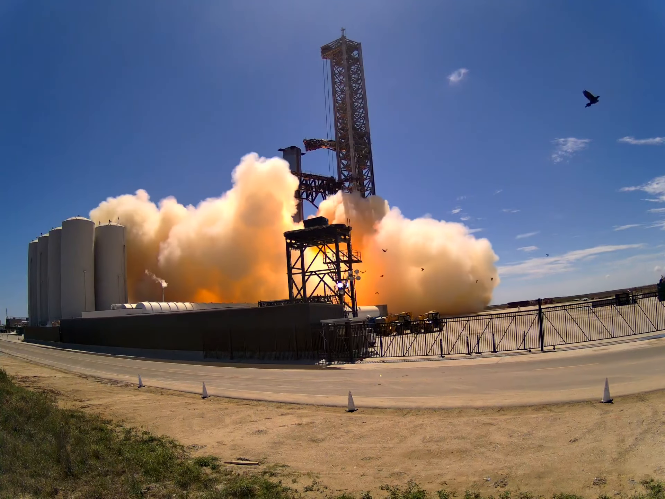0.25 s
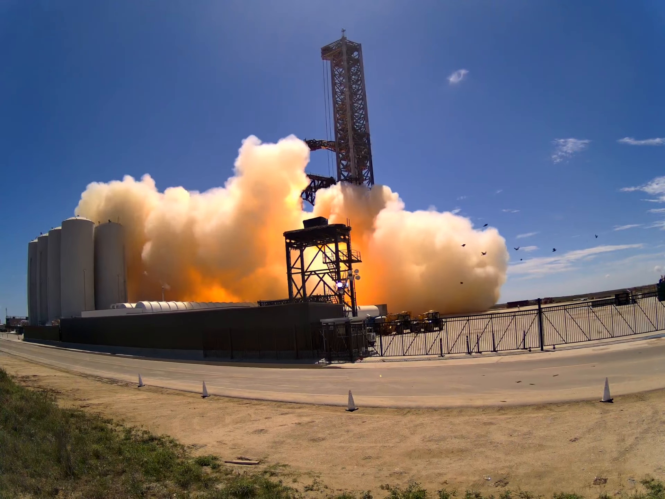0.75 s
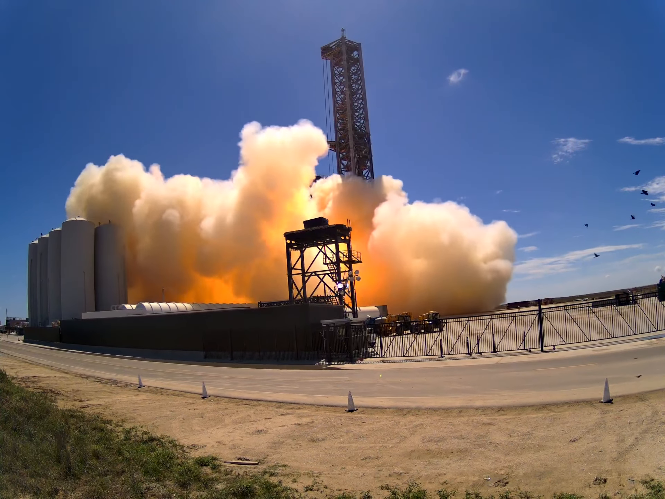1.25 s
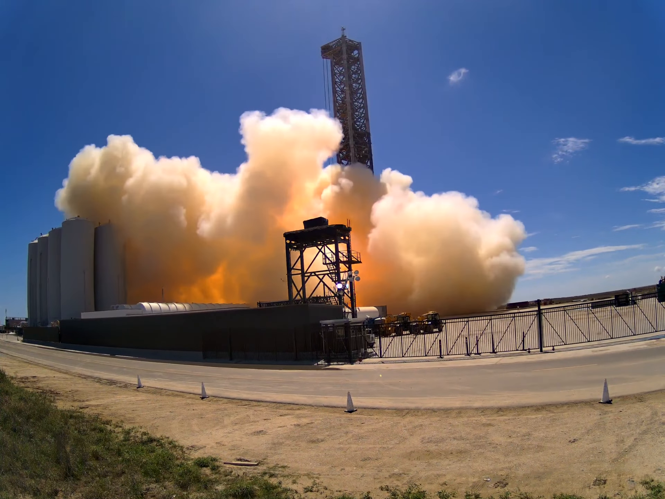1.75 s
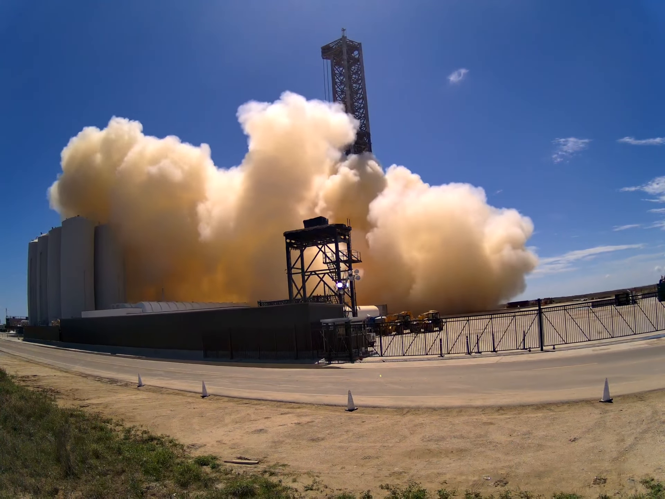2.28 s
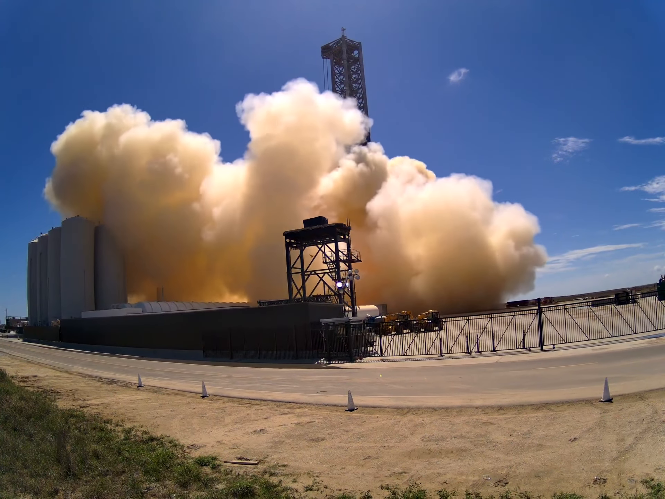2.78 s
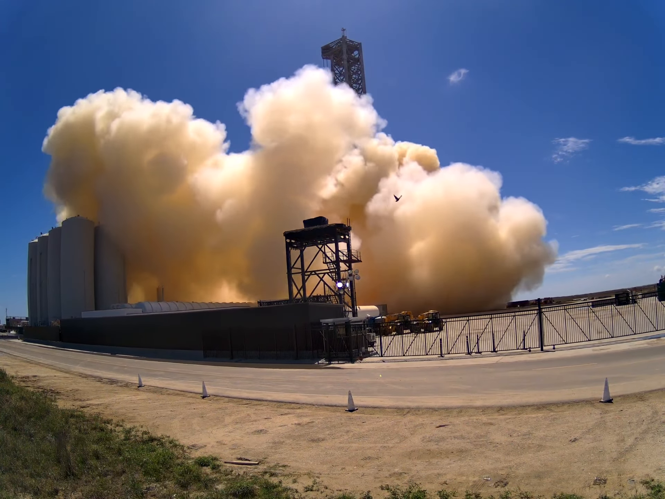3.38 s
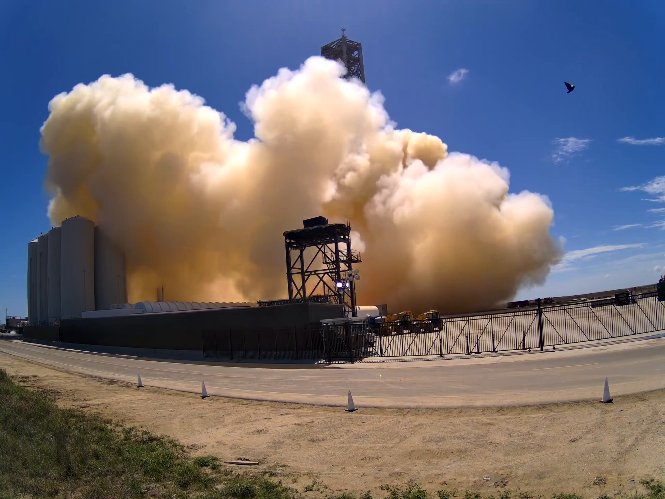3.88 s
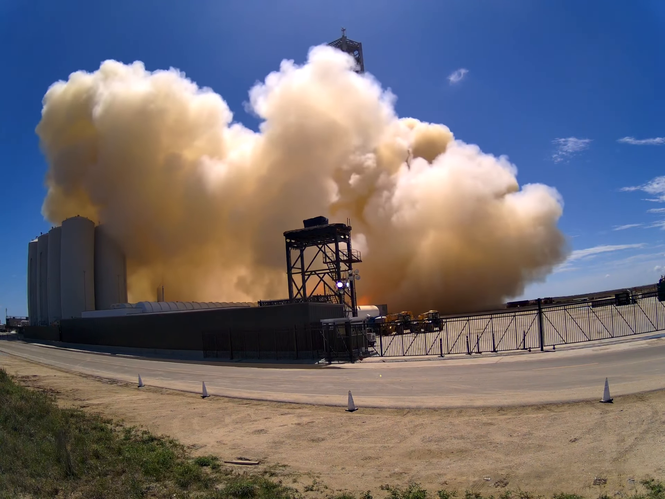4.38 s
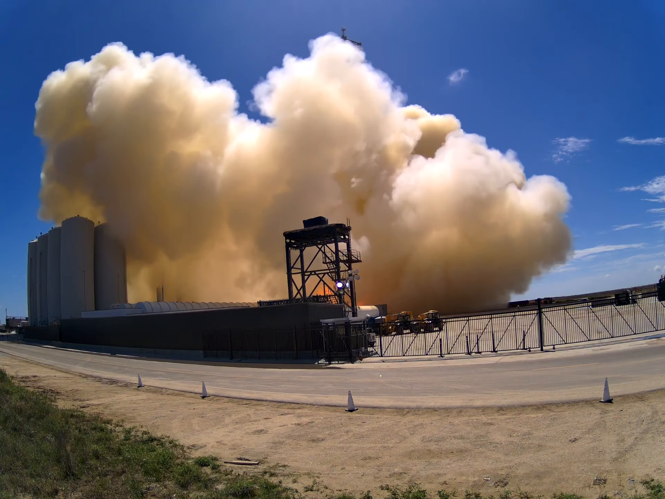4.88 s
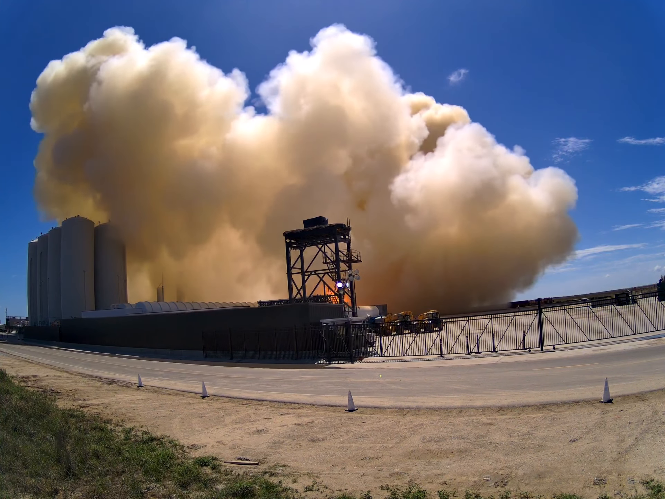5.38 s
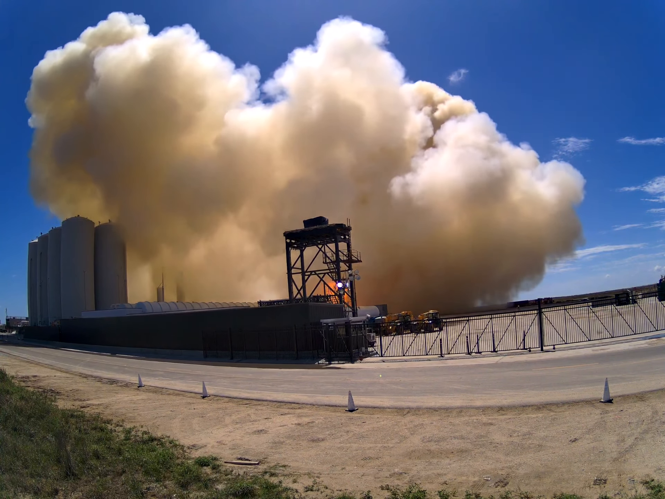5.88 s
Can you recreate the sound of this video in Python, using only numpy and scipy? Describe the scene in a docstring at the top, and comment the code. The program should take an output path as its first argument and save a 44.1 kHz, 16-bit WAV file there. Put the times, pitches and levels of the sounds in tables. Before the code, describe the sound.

A loud, crackling rocket roar shuts down outdoors, leaving a deep rumble and a swelling, whistling hiss of venting gas.

```python
"""Rocket engines fire on a distant outdoor test stand. Turbulent eddies in the exhaust roar, a howl wanders
within the roar, and shock waves crackle, so loudly that the microphone's input overloads and its gain
control holds the level down. After shutdown the roar rolls off over the plain and a deep rumble lingers.
A gas vent then swells up, hissing, and whistling at the resonances of its pipe and mouth."""
import sys
import numpy as np
from scipy import signal
from scipy.fft import rfft, irfft, next_fast_len
from scipy.io import wavfile
from scipy.ndimage import uniform_filter1d, map_coordinates

SR = 44100
rng = np.random.default_rng(int(sys.argv[2]) if len(sys.argv) > 2 else 0)


def digitize_waveform(pressure):
    """Quantize a signal to 16-bit integers and store it at the path in sys.argv[1].

    Rows of a 2-D input are taken as channels; values are limited to [-1, 1].
    """
    field = np.atleast_2d(pressure).T
    bounded = np.clip(field, -1, 1)
    quanta = np.round(bounded * 32767).astype(np.int16)
    wavfile.write(sys.argv[1], SR, quanta)


N = 270774

# arriving strength of the jet, through shutdown and roll-off: (time [s], level re full thrust [dB])
JET_STRENGTH = [(0, -1.5), (.3, 0.1), (1.0, -0.5), (1.6, -0.15), (2.3, -0.6), (2.55, -2), (2.8, -3.5),
                (2.92, -9.5), (3.03, -11), (3.12, -15.5), (3.3, -18), (3.6, -21.5), (4.3, -23), (4.7, -26),
                (6.14, -28)]
# swings of the jet's treble beside its strength: (time [s], level [dB])
JET_TREBLE = [(0, -1.1), (.5, 1), (.7, -3), (1.4, 0), (2.2, 1.5), (2.4, -2.5), (2.7, -1.5), (2.82, -2),
              (2.9, -2.5), (3.0, 3), (3.1, 3), (4.2, 2)]
# rumble of the exhaust cloud: (time [s], level [dB])
RUMBLE_LEVEL = [(0, -16.5), (1, -22), (1.5, -21.5), (2.5, -25), (2.9, -20.5), (3.15, -28), (3.6, -29.5),
                (4.0, -26.5), (4.5, -25), (4.8, -28), (5.1, -25.5), (5.45, -25.5), (5.8, -29), (6.14, -29)]
# strongest shock waves: (time [s], relative level [dB])
STRONG_SHOCKS = [(0.0428, -26), (0.0932, -22), (0.0974, -21), (0.1121, -18), (0.164, -19), (0.1774, -25),
                 (0.2024, -23), (0.2104, -23), (0.3805, -20), (0.3934, -24), (0.4054, -26), (0.414, -17),
                 (0.4369, -18), (0.4454, -19), (0.4774, -22), (0.5247, -20), (0.5404, -21), (0.6709, -24),
                 (0.7622, -26), (0.7926, -19), (1.0224, -23), (1.2266, -22), (1.3957, -25), (1.4197, -20),
                 (1.4304, -21), (1.4444, -21), (1.511, -22), (1.5359, -22), (1.5793, -25), (1.6945, -19),
                 (1.7204, -26), (1.7669, -21), (1.8103, -24), (1.8243, -20), (1.8464, -26), (1.8657, -24),
                 (1.8826, -22), (1.9594, -25), (2.0467, -22), (2.0564, -23), (2.0862, -21), (2.1214, -21),
                 (2.177, -20), (2.2124, -21), (2.3022, -24), (2.3286, -24), (2.5194, -25), (2.5554, -27),
                 (2.7477, -25), (2.7911, -28)]


def amp(db):
    """Amplitude ratio of a level in decibels."""
    return 10 ** (np.asarray(db) / 20)


def unit(x):
    """Normalisation to rms 1."""
    return x / np.sqrt(np.mean(x ** 2) + 1e-20)


def colour(points):
    """Frequency response through (frequency [Hz], level [dB]) points on a logarithmic axis."""
    f, db = np.transpose(points)
    return lambda hz: amp(np.interp(np.log(hz + .1), np.log(f), db, left=-120))


def resonant(modes):
    """Superposed resonances with steep skirts, from (frequency [Hz], width [Hz], level [dB])."""
    return lambda f: sum(amp(db) * (f * w / np.hypot(c * c - f * f, f * w)) ** 2 for c, w, db in modes)


def curves(rows):
    """Linear interpolation: one value per sample for each column after the time."""
    times, *columns = np.transpose(rows)
    return [np.interp(np.arange(N) / SR, times, column) for column in columns]


def wobble(rate):
    """Smooth random modulation with `rate` knots a second."""
    return map_coordinates(rng.standard_normal(int(N * rate / SR) + 4), [np.arange(N) * rate / SR])


def filtered(x, response):
    """Linear filtering: the spectrum times a frequency response."""
    size = next_fast_len(N + SR)
    return irfft(rfft(x, size) * response(np.fft.rfftfreq(size, 1 / SR)), size)[..., :N]


def rush(response, patchy_db=0):
    """Coloured noise of rms 1, its level varying in random patches of time and frequency."""
    spectra = signal.stft(rng.standard_normal(N + 512), nperseg=512)[2]
    patches = uniform_filter1d(uniform_filter1d(rng.standard_normal(spectra.shape), 6, 0), 12, 1)
    noise = signal.istft(spectra * amp(patchy_db * unit(patches)), nperseg=512)[1][:N]
    return unit(filtered(noise, response))


def power_law(drive_db, full_db, slope, floor_db):
    """Level [dB] that moves by `slope` dB per dB of its drive, summed in power with a floor."""
    return 20 * np.log10(np.hypot(amp(full_db + slope * drive_db), amp(floor_db)))


def vent():
    """Escaping gas hisses broadly; resonance in the pipe and mouth narrows the noise to whistles."""
    # gas flow: (time [s], level re wide open [dB])
    flow = [(3.7, -47), (4.1, -17), (4.4, -8), (4.7, -8), (4.9, -3), (5.1, 1.1), (5.35, 1), (5.55, -1),
            (5.7, 0), (6.14, -1.1)]
    # surges of the whistles: (time [s], rise in the pipe [dB], rise at the mouth [dB])
    puffs = [(4.73, 4, 7), (4.84, 0, 7.5), (4.98, 3.5, 6.5), (5.15, -6, 2.5), (5.34, 4.5, 3.5),
             (5.4, -2, 2.5), (5.54, 1.5, 2), (5.6, 1.5, 0), (5.68, 6, 3), (5.79, -5, 4), (5.87, 4, 2.5),
             (5.93, -6, -1), (6.01, 6, -2), (6.1, -0.5, 7.5)]
    # spectrum of the hiss: (frequency [Hz], relative level [dB])
    hiss_spectrum = [(250, -32.5), (600, -14.5), (900, -0.5), (1400, -5), (2200, -4.5), (3100, -9.5),
                     (4200, -14), (5500, -16.5), (7000, -15), (9000, -20)]
    # resonances of pipe and mouth: (frequency [Hz], width [Hz], relative level [dB])
    pipe_modes = [(2770, 190, 6.5), (850, 89, -3.5), (2110, 120, -7.5)]
    mouth_modes = [(5897, 170, -4), (4780, 170, -17)]
    t, puff_s = np.arange(N) / SR, .03
    flow_db, = curves(flow)
    pipe_db, mouth_db = sum(np.outer(db, np.exp(-((t - at) / puff_s) ** 2)) for at, *db in puffs)
    pipe_db += power_law(flow_db, -46.5, 0.92, -98.5)
    mouth_db += power_law(flow_db, -48, 1.3, -93)
    hiss_db = power_law(flow_db, -37.5, 1.07, -97.5)
    hiss = amp(hiss_db + 0.17 * wobble(13)) * rush(colour(hiss_spectrum), patchy_db=1.84)
    pipe = amp(pipe_db + 1.7 * wobble(25)) * rush(resonant(pipe_modes))
    mouth = amp(mouth_db + 1.4 * wobble(45)) * rush(resonant(mouth_modes))
    return hiss + pipe + mouth


def rumble():
    """Low-frequency pressure waves roll in from the cloud; short wave packets are heard as dull thuds."""
    # spectrum of the rumble: (frequency [Hz], relative level [dB])
    spectrum = [(1, -30), (4, -7), (11, -7), (25, -12), (55, -14), (110, -26), (300, -65)]
    # thuds: (time [s], frequency [Hz], peak level [dB], half-width [s])
    packets = [(2.922, 50, -17.5, .02), (2.985, 63, -14, 0.017), (3.113, 35, -18, .02),
               (3.7, 16, -14, 0.018), (3.967, 75, -22, 0.014), (3.999, 27, -15.5, .025),
               (4.167, 61, -20.5, .016), (4.446, 80, -20.5, .015), (4.531, 70, -21.5, 0.017),
               (4.596, 22, -17.5, 0.034), (5.186, 68, -21.5, 0.034), (5.365, 14, -28, 0.03),
               (5.581, 45, -21, 0.022), (5.923, 38, -25.5, 0.03)]
    t = np.arange(N) / SR
    thuds = sum(-amp(db) * np.exp(-((t - at) / width) ** 2) * np.cos(2 * np.pi * hz * (t - at))
                for at, hz, db, width in packets)
    return amp(curves(RUMBLE_LEVEL)[0]) * rush(colour(spectrum), patchy_db=1.3) + thuds


def howl():
    """Narrow-band noise has a pitch: it wanders inside the roar, comes in bursts and sinks at shutdown."""
    # course of the howl: (time [s], centre frequency [Hz], prominence [dB])
    course = [(0, 344.7, -2.5), (.4, 299.4, -11.5), (.95, 299.4, -6), (1.05, 220.7, -0.5), (1.3, 215.2, -1),
              (1.45, 225, 0), (1.75, 225.1, 0), (1.95, 300.7, -11), (2.2, 308.8, -0.5), (2.37, 250, 1),
              (2.5, 321.1, 3), (2.65, 291, 8), (2.77, 299.6, 1.5), (2.87, 230, 2), (3.0, 216.6, 7.5),
              (3.12, 215, -1), (3.5, 225.2, 3.5), (6.14, 244, -4)]
    centre_hz, prominence_db = curves(course)
    phase = 2 * np.pi * np.cumsum(centre_hz * (1 + .04 * wobble(9))) / SR
    level_db = power_law(curves(JET_STRENGTH)[0], -13.5, 0.94, -66) + prominence_db + 1.5 * wobble(14)
    band = wobble(145) * np.cos(phase) + wobble(145) * np.sin(phase)
    return amp(level_db) * unit(band)


def shock_front(rise_s, fall_s):
    """A shock wave: a sudden pressure jump that relaxes through zero."""
    t = np.arange(SR // 50) / SR
    return (1 - np.exp(-t / rise_s)) * (1 - t / fall_s) * np.exp(-t / fall_s)


def crackle():
    """Small shocks arrive as a Poisson process over a ragged fizz; both surge around each strong shock."""
    # spectrum of the plume's edge: (frequency [Hz], relative level [dB])
    fizz_spectrum = [(1500, -38), (3000, -7), (4500, 0), (6000, -2.5), (9000, -2)]
    t, surge_s, shocks_per_s = np.arange(N) / SR, 0.022, 260
    surge_db = 1.4 * sum(np.exp(-((t - at) / surge_s) ** 2) for at, _ in STRONG_SHOCKS)
    tearing_db = power_law(curves(JET_STRENGTH)[0], -19, 2.2, -76) + curves(JET_TREBLE)[0] + surge_db
    arrivals = rng.random(N) < shocks_per_s / SR
    sizes = amp(np.minimum(3.0 * rng.exponential(size=N), 9) + 7.5)
    shocks = signal.fftconvolve(arrivals * sizes, shock_front(rise_s=.00006, fall_s=.00041))[:N]
    fizz_db = -9.0 + 0.32 * wobble(6.5) + 1.1 * wobble(110)
    fizz = amp(fizz_db) * rush(colour(fizz_spectrum), patchy_db=0.5)
    fierceness = amp(3.0 * np.minimum(tearing_db + 28, 0))  # a weak jet no longer forms shocks
    return amp(tearing_db) * (fierceness * shocks + fizz)


def cracks(pressure):
    """Each strong shock throws the pressure against its swing with a bright snap; a weaker one follows."""
    jump_s, ring_s, ring_hz, start_pressure = .00007, .0003, 6400, .16
    t, cracked = np.arange(-40, 41) / SR, pressure.copy()
    window = np.exp(-(t / ring_s) ** 2)
    snap = np.exp(-(t / jump_s) ** 2) + amp(-13.5) * window * np.cos(2 * np.pi * ring_hz * t)
    for at, db in STRONG_SHOCKS:
        after_crack = (rng.uniform(.0016, .0036), -8.5 - 4 * rng.random())
        for delay_s, offset_db in ((.001, 0), after_crack):
            centre = round((at + delay_s) * SR)
            near, side = slice(centre - 40, centre + 41), np.sign(cracked[centre])
            pull = window * (side * start_pressure - cracked[near])
            cracked[near] += pull - side * amp(db + 12 + offset_db) * snap
    return cracked


def exhaust():
    """Turbulent mixing noise: eddies of three sizes radiate, each by its own power law of jet strength."""
    # spectra of large, middle and fine eddies: (frequency [Hz], relative level [dB])
    boom_spectrum = [(40, -18), (70, 0.5), (120, 3.5), (200, 0.5), (260, -4.5), (500, -71.5)]
    roar_spectrum = [(90, -29.5), (170, -6.5), (240, -3.5), (340, -0.5), (560, -6), (900, -12), (1500, -23),
                     (3000, -31.5), (4900, -45.5), (5800, -55.5), (9000, -72)]
    rasp_spectrum = [(400, -26), (1000, -1.5), (2000, -13.5), (3500, -21), (4800, -24.5), (5700, -36.5),
                     (9000, -48.5)]
    jet_db, = curves(JET_STRENGTH)
    rolling = amp(curves(RUMBLE_LEVEL)[0] - 5.5)  # large eddies keep rolling with the cloud
    boom_gain = np.hypot(amp(power_law(jet_db, -16.5, 1.5, -44)), rolling)
    boom = boom_gain * rush(colour(boom_spectrum), patchy_db=0.74)
    roar = amp(power_law(jet_db, -8.5, 1.012, -62)) * rush(colour(roar_spectrum), patchy_db=1.24)
    rasp_db = power_law(jet_db, -20, 1.7, -57.5) + curves(JET_TREBLE)[0] + 0.91 * wobble(60)
    rasp = amp(rasp_db) * rush(colour(rasp_spectrum), patchy_db=4.0)
    return boom + roar + rasp


def scene():
    """Superposition of all sources in one channel, broken by the strong shocks."""
    return cracks(exhaust() + howl() + crackle() + rumble() + vent())[None]


def overload(x):
    """Asymmetric saturation: the input stage flattens the upward swing earlier than the downward."""
    limit, hardness = np.where(x > 0, .27, .36), 6.1
    clipped = x / (1 + np.abs(x / limit) ** hardness) ** (1 / hardness)
    edges = x - uniform_filter1d(x, size=15)
    return clipped + 0.058 * x + 0.14 * edges  # a little slope stays; fast edges ride over the flat tops


def gain_control(x, loud_db=-12, share=0.69, averaging_s=.8):
    """Compression: the gain creeps up by a share of the mean power's drop below the loud level."""
    decay = np.exp(-1 / (averaging_s * SR))
    power = signal.lfilter([1 - decay], [1, -decay], x ** 2, zi=[[amp(2 * loud_db)]])[0]
    return x * amp(share * np.maximum(loud_db - 10 * np.log10(power), 0))


def record(dry):
    """Signal chain: overload, high-pass coupling, gain control, microphone response and band limit."""
    # microphone response: (frequency [Hz], gain [dB])
    microphone = [(.5, 0), (2860, -0.5), (2940, -5.5), (3150, -3.5), (5600, -8), (6800, -5), (7200, -7),
                  (7600, -28), (7800, -64), (8300, -69.5)]
    coupling_hz, top_hz, skirt_hz = 5, 8333, 400
    coupled = filtered(overload(dry), lambda hz: 1j * hz / (coupling_hz + 1j * hz))
    coloured = filtered(gain_control(coupled), colour(microphone))
    return filtered(coloured, lambda hz: np.clip((top_hz - hz) / skirt_hz, 0, 1) ** 2)


dry = scene()
out = record(dry)
digitize_waveform(out)
```